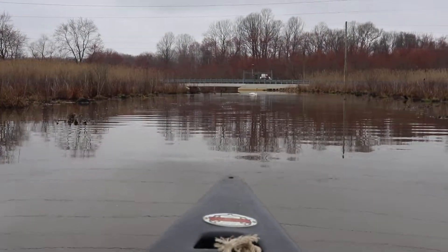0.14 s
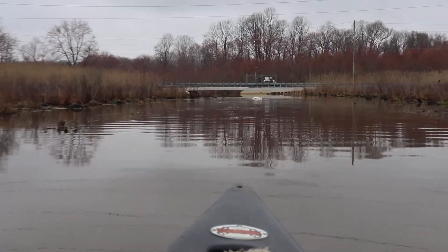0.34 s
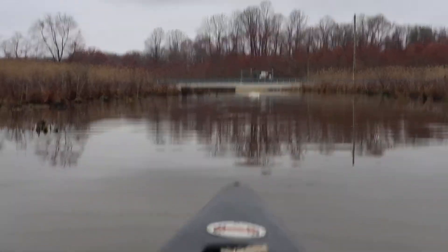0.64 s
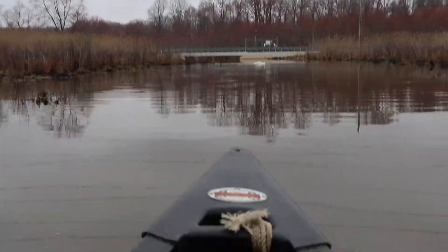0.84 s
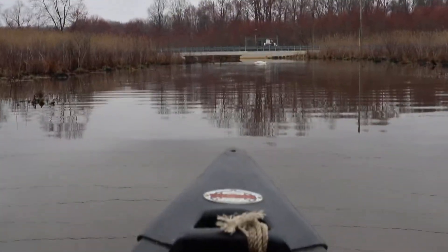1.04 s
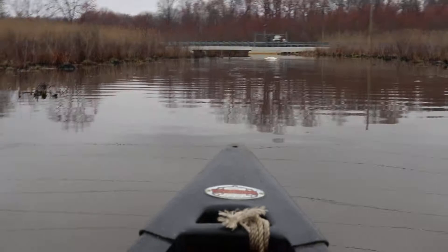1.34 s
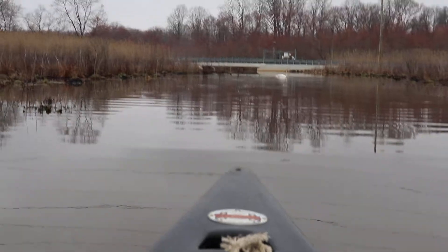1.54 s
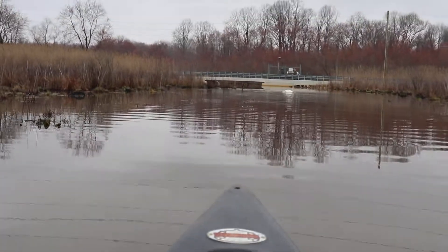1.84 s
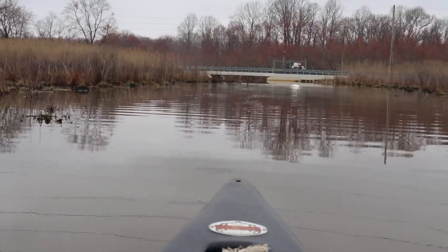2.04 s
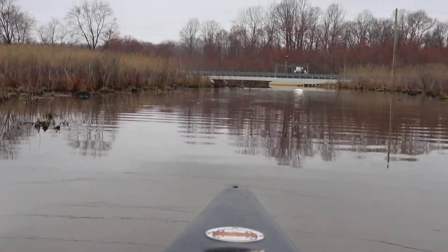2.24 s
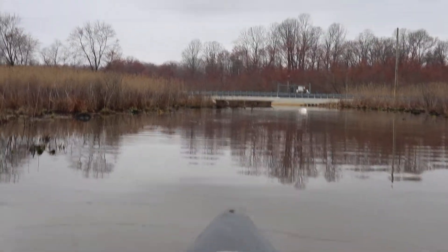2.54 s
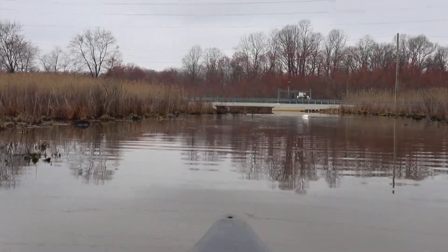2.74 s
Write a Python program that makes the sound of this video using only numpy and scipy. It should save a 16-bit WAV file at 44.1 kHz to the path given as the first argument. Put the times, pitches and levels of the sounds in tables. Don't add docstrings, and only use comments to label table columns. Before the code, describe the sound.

Water slaps and plunks near a boat hull on an open marsh. A deep hollow plunk at 0.07 s, a rough bright slap with thumps at 0.4-0.5, sharp flicks near 0.78. Small bloops at 1.4, faint hoarse bird chips at 1.6 and 1.75, light knocks at 2.46, a quick rising gurgle at 2.6-2.7. Throughout, a thin buzzing camera-motor whine, low rumble and soft air hiss.

```python
import sys
import numpy as np
from scipy import signal
from scipy.fft import rfft, irfft
from scipy.io import wavfile
from scipy.ndimage import uniform_filter1d

SR = 44100
rng = np.random.default_rng(int(sys.argv[2]) if len(sys.argv) > 2 else 0)


def inscribe(sig):
    pcm = np.round(np.clip(np.atleast_2d(sig).T, -1, 1) * 32767)
    wavfile.write(sys.argv[1], SR, pcm.astype(np.int16))


def voltage_ratio(decibels):
    exponent = np.asarray(decibels, float) / 20
    return 10 ** exponent


N = 127008
T = np.arange(N) / SR


def curve(points, hz):
    p = np.array(points, float)
    return np.interp(np.log(hz), np.log(p[:, 0]), p[:, 1])


def unit(x):
    return x / np.sqrt(np.mean(x ** 2))


def walk(rate_hz):
    hold = int(SR / rate_hz)
    steps = np.repeat(rng.standard_normal(N // hold + 1), hold)
    return 0.83 * uniform_filter1d(uniform_filter1d(steps, hold), hold)[:N]


def add(out, start_s, x, pan_db=0.):
    i = int(start_s * SR)
    x = x[..., :N - i]
    out[:, i:i + x.shape[-1]] += x * voltage_ratio(np.array([[pan_db], [-pan_db]]) / 2)


def band(x, hz, width_hz):
    f = np.fft.rfftfreq(x.shape[-1], 1 / SR)
    bell = np.exp(-np.abs((f - hz) / width_hz) ** 3)
    return unit(irfft(rfft(x) * bell, x.shape[-1]))


def whine():
    low_family_db = [-51.5, -48.5, -52.5, -63.5, -66]
    high_family_db = [-63, -49, -49.5, -57.5]
    overtone_db = [-72, -82, -84]
    # (time [s], low family [dB], high family [dB], high family L-R [dB])
    drift = [(0, 0, 0.5, 3.5), (.9, 0, 0.5, 3), (1.5, -1, -0.5, 4), (2.05, -2.5, -1, -1),
             (2.88, -2, 0.5, 1)]
    carrier_hz, spin_hz = (1705.14, 1704.72), (120.36, 120.25)
    slip_at_s, slip_s, slip_takes_s = 1.4228, .00138, .0006
    throb_s = 1.43787

    time_s, low_db, high_db, pan_db = np.array(drift, float).T
    low_db, high_db, pan_db = (np.interp(T, time_s, c) for c in (low_db, high_db, pan_db))
    clock_s = T - throb_s - slip_s * np.clip((T - slip_at_s) / slip_takes_s, 0, 1)
    base = 2 * np.pi * np.where(clock_s < 0, *carrier_hz) * clock_s + 0.088 * walk(8.8)
    spin = 2 * np.pi * np.where(clock_s < 0, *spin_hz) * clock_s

    def tone(phase, db):
        return np.sqrt(2) * voltage_ratio(db + 1.1 * walk(9)) * np.sin(phase + .15 * walk(12))

    low = high = 0
    for k, db in enumerate(low_family_db, -1):
        low = low + tone(base + k * (spin - np.pi / 3) + abs(k) * np.pi / 2, db)
    for k, db in enumerate(high_family_db, -2):
        high = high + tone(2 * base + k * spin, db)
    for phase, db in zip((3 * base - spin, 4 * base - spin, 4 * base), overtone_db):
        high = high + tone(phase, db)
    side = voltage_ratio(-14.0) * np.array([[1], [-1]]) * np.roll(low, 6)
    return (low + side) * voltage_ratio(low_db) + high * voltage_ratio(high_db + np.array([pan_db, -pan_db]) / 2)


def bed(points, lo_hz, hi_hz, db, flicker_db, rate_hz):
    # (frequency [Hz], level [dB])
    side_db = [(30, -15.5), (200, -16.5), (400, -10.5), (800, -6.5), (2500, -2), (5000, -1), (15000, 2)]
    f = np.fft.rfftfreq(N, 1 / SR) + 1
    shape = voltage_ratio(curve(points, f)) * rfft(rng.standard_normal((2, N)))
    shape[1] *= voltage_ratio(curve(side_db, f))
    out = 0
    for k in range(int(np.ceil(3 * np.log2(hi_hz / lo_hz)))):
        hz = lo_hz * 2 ** (k / 3)
        inside = (f >= hz) & (f < min(hz * 2 ** (1 / 3), hi_hz))
        out = out + voltage_ratio(flicker_db * walk(rate_hz)) * irfft(shape * inside, N)
    mid, side = out * voltage_ratio(db) / np.std(out[0])
    return np.array([mid + side, mid - side])


def rumble():
    # (frequency [Hz], slope-free level [dB])
    rumble_db = [(15, -43), (25, -20), (69, 1), (156, -6), (209, 0), (444, -13.5), (626, -13.5),
                 (1030, -18), (1500, -20.5), (1950, -52), (3300, -120)]
    return bed(rumble_db, 25, 1500, db=-42, flicker_db=2.1, rate_hz=8.8)


def hiss():
    # (frequency [Hz], level [dB])
    hiss_db = [(1500, 3), (2600, -2.5), (3700, -6), (5500, -14), (7000, -14.5), (10500, -22.5),
               (13300, -28.5), (16000, -28)]
    return bed(hiss_db, 1520, 16500, db=-53, flicker_db=0.68, rate_hz=12.47)


def hums():
    # (frequency [Hz], width [Hz], level [dB])
    colours = [(128.2, 21.5, -48.5), (159, 16, -61), (209.2, 28.3, -48.5), (277.6, 31, -54), (400, 98, -65),
               (673, 124, -55), (5000, 760, -67.5), (13300, 350, -78)]
    out = 0
    for hz, width_hz, db in colours:
        out = out + voltage_ratio(db + 1.45 * walk(13)) * band(rng.standard_normal(N), hz, width_hz)
    return out


def puffs(rows, rise, buzz_hz, pan_db):
    out, t = np.zeros((2, N)), T[:4096]
    for start_s, hz, width_hz, length_s, db in rows:
        env = np.minimum(t / (rise * length_s), 1) ** 2 * np.exp(-(t / length_s) ** 3)
        env = env * (1 + .5 * np.sin(2 * np.pi * buzz_hz * t))
        a, b = band(rng.standard_normal((2, len(t))), hz, width_hz)
        add(out, start_s, voltage_ratio(db) * env * np.array([a + 0.64 * b, a - 0.5 * b]), pan_db)
    return out


def ticks():
    # (time [s], frequency [Hz], width [Hz], length [s], level [dB])
    droplets = [(.01, 4900, 600, .004, -48), (.047, 7500, 700, 0.0053, -53),
                (.056, 8500, 2000, 0.0023, -48), (.117, 3800, 1200, 0.0027, -47),
                (.491, 5300, 700, 0.006, -48.5), (.587, 7200, 1500, 0.0027, -53),
                (.606, 4330, 600, 0.0069, -53), (.805, 9700, 1200, 0.0018, -45),
                (1.064, 4460, 400, 0.0063, -47), (1.117, 9200, 1860, 0.0044, -44.5),
                (1.21, 4400, 400, 0.0044, -45.5), (1.537, 11000, 3020, 0.0019, -51.5),
                (1.672, 8300, 2500, 0.0022, -52.5), (2.08, 6900, 2500, 0.0034, -52.5),
                (2.113, 4150, 350, 0.005, -50), (2.456, 6400, 2200, .0015, -45),
                (.397, 13100, 2500, 0.0063, -56), (.397, 6440, 1500, 0.0028, -43),
                (.4525, 12500, 3000, 0.0017, -53), (.457, 8500, 2000, 0.0046, -50),
                (.7737, 10500, 3500, 0.0011, -41), (.786, 11500, 2500, .0015, -52),
                (.4185, 4260, 920, 0.011, -33.5)]
    return puffs(droplets, rise=0.17, buzz_hz=0, pan_db=-1.)


def splashes():
    # (time [s], frequency [Hz], width [Hz], length [s], level [dB])
    dull = [
        (.065, 1300, 1230, .014, -39),
        (.08, 670, 398, 0.022, -37.5),
        (.458, 870, 600, 0.028, -45),
        (1.435, 2030, 300, 0.017, -46.5),
        (2.485, 950, 300, 0.023, -44),
        (2.502, 890, 250, 0.006, -44),
        (2.689, 1570, 120, 0.011, -40),
    ]
    return puffs(dull, rise=0.16, buzz_hz=200, pan_db=1.)


def thumps():
    # (time [s], frequency [Hz], level [dB], rise [s], t60 [s])
    plunks = [(.0665, 384, -26, 0.00086, 0.024), (.067, 756, -31, 0.0031, 0.048),
              (.068, 960, -29, 0.0013, 0.025), (0.068, 436, -16.5, 0.0053, 0.044),
              (.066, 167.7, -24, 0.0064, 0.17), (0.0782, 216, -15.5, 0.0041, 0.12),
              (.074, 710, -38, .002, .04), (.087, 820, -39, 0.0017, 0.035),
              (.099, 240, -26.5, 0.0037, 0.047), (0.118, 168, -23.5, 0.0021, 0.13),
              (.399, 727, -36, 0.0015, .05), (0.418, 1400, -32, .0005, .015),
              (.421, 2300, -30, .0008, 0.026), (.4185, 590, -26.5, 0.0028, 0.035),
              (.426, 405, -24, 0.00057, 0.04), (0.4232, 258, -20.5, 0.0026, 0.028),
              (.4515, 2110, -39, .001, .03), (0.457, 1270, -45, .002, .04),
              (.425, 135.6, -25, 0.0099, 0.16), (.432, 626, -28, 0.00087, 0.049),
              (.438, 273, -23, 0.0065, 0.046), (0.452, 463, -29, 0.0015, 0.06),
              (0.471, 270, -27.5, 0.0051, 0.025), (.492, 178, -28.5, 0.0034, 0.09),
              (.767, 348, -31.5, 0.0012, 0.071), (.774, 417, -34, 0.00057, 0.038),
              (1.433, 198, -31.5, 0.0017, 0.042), (.7675, 810, -32, .0005, .015),
              (.7738, 1910, -29, 0.00047, 0.011), (.775, 890, -29.5, .0005, .015),
              (.785, 770, -26.5, .0005, 0.02), (2.4565, 646, -23.5, 0.00036, 0.012),
              (2.455, 1900, -28.5, .0004, 0.014), (2.487, 1110, -30, .0004, .015),
              (2.4905, 860, -27, .0004, .015), (2.4936, 1060, -28, .0004, 0.009),
              (2.497, 940, -28, .0004, 0.0098)]
    out, t = np.zeros((2, N)), T[:SR // 2]
    for start_s, hz, db, rise_s, t60_s in plunks:
        push = np.sin(np.pi / 2 * np.minimum(t / rise_s, 1)) ** 2
        decay = np.exp(-np.log(1000) * np.maximum(t - rise_s, 0) / t60_s)
        lag = min(hz / 2500, .4) * np.array([[1], [-1]])
        add(out, start_s, voltage_ratio(db) * push * decay * np.sin(2 * np.pi * hz * t + lag), -1.)
    return out


def slaps():
    # (time [s], hold [s], level [dB], brightness [Hz], L-R [dB])
    wing = [
        (0.224, 0.004, -45, 5000, 0),
        (0.393, 0.0094, -34, 2470, -3),
        (0.4167, 0.0091, -25.5, 2700, -0.5),
        (.4238, .001, -29, 8000, -3),
        (.45, .014, -37, 2600, -4),
        (.7737, .0005, -36, 10000, 0),
        (.782, .001, -43, 3000, -4),
        (1.42, 0.0044, -46, 5000, -4),
    ]
    spray_hz, tail_t60_s, rough_db, side = 5000, .07, 2.5, 0.88
    out, t = np.zeros((2, N)), T[:4096]
    f = np.fft.rfftfreq(len(t), 1 / SR)
    for start_s, hold_s, db, bright_hz, pan_db in wing:
        a, b, c = rng.standard_normal((3, len(t)))
        tilt = (f / 400) / np.sqrt(1 + (f / 400) ** 2) / (1 + (f / bright_hz) ** 2) ** 0.99
        body = rfft(np.array([a + side * b, a - side * b])) * tilt
        whole = irfft(body, len(t))
        fine = irfft(body / (1 + (spray_hz / (f + 1)) ** 4), len(t))
        t60_s = tail_t60_s * np.sqrt(hold_s / 0.014)
        tail = np.exp(-np.log(1000) * np.maximum(t - hold_s, 0) / t60_s)
        late_fine = fine * np.minimum(t / (0.21 * hold_s), 1) ** 2 * tail
        spray = (whole - fine + late_fine) / np.std(whole)
        env = np.minimum(t / min(.0008, hold_s / 4), 1) * tail
        rough = voltage_ratio(db + rough_db * unit(uniform_filter1d(c, size=20)))
        add(out, start_s, rough * env * spray, pan_db)
    return out


def bubbles():
    # (time [s], start [Hz], end [Hz], length [s], level [dB])
    glides = [(.425, 3700, 3720, .003, -28.5), (.553, 2380, 2400, .005, -43), (.647, 2380, 2360, .008, -45),
              (1.368, 660, 720, .01, -33), (1.38, 760, 860, .014, -41), (1.368, 4000, 4200, .012, -53),
              (1.572, 3500, 3800, .011, -42), (1.748, 5250, 5200, .007, -50),
              (1.847, 4530, 4560, .008, -49), (1.858, 4660, 4600, .008, -45), (2.457, 740, 900, .01, -33),
              (2.511, 340, 270, .03, -41)]
    fade_per_s, attack_s, wobble_db = 45, .0012, 1.2
    out = np.zeros((2, N))
    for start_s, hz0, hz1, length_s, db in glides:
        t = T[:int(1.4 * length_s * SR)]
        hz = hz0 * (hz1 / hz0) ** (t / length_s)
        fade = np.exp(-fade_per_s * t * np.minimum(.02 / length_s, 1))
        fade = fade * np.clip((1.4 - t / length_s) / .4, 0, 1)
        env = voltage_ratio(db + wobble_db * walk(180)[:len(t)]) * np.minimum(t / attack_s, 1) * fade
        add(out, start_s, np.sqrt(2) * env * np.sin(2 * np.pi * np.cumsum(hz) / SR), 2.)
    return out


def chips():
    # (time [s], frequency [Hz], width [Hz], length [s], level [dB])
    calls = [
        (1.578, 4100, 700, .016, -42),
        (1.591, 4000, 750, .019, -40),
        (1.741, 4500, 1000, .018, -49),
        (1.754, 4100, 800, .018, -48),
    ]
    return puffs(calls, rise=0.19, buzz_hz=150, pan_db=2.3)


def gurgle():
    # (time [s], pitch [Hz], level [dB])
    pocket = [
        (2.595, 400, -62),
        (2.606, 424, -47),
        (2.635, 472, -49.5),
        (2.657, 530, -44),
        (2.672, 660, -57),
        (2.683, 828, -38.5),
        (2.696, 1163, -41.5),
        (2.708, 1547, -44),
        (2.72, 1950, -51),
    ]
    time_s, hz, db = np.array(pocket).T
    pitch_hz = np.interp(T, time_s, hz) * (1 + .02 * walk(200))
    level_db = np.interp(T, time_s, db, -150, -150) + 1.5 * walk(150)
    tone = np.sin(2 * np.pi * np.cumsum(pitch_hz) / SR) * voltage_ratio(level_db)
    return np.sqrt(2) * tone * voltage_ratio(np.array([[1.5], [-1.5]]))


def scene():
    floor = whine() + rumble() + hiss() + hums()
    water = ticks() + splashes() + thumps() + slaps() + bubbles() + gurgle()
    return floor + water + chips()


def band_limit(x):
    return signal.sosfilt(signal.butter(12, 15880, fs=SR, output="sos"), x)


def record(dry):
    lowpass = signal.ellip(10, .2, 80, 15850, fs=SR, output="sos")
    mix = signal.sosfilt(lowpass, dry)
    return band_limit(mix)


dry = scene()
out = record(dry)
inscribe(out)
```